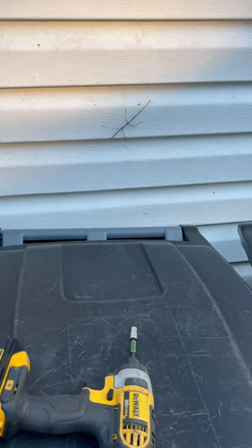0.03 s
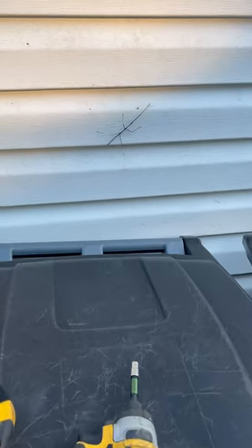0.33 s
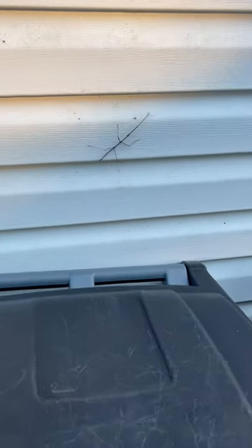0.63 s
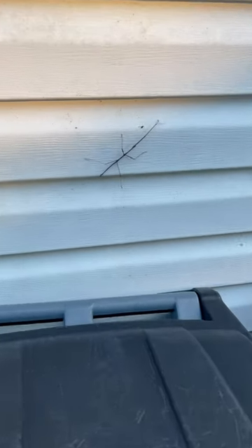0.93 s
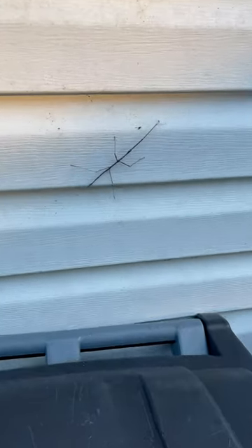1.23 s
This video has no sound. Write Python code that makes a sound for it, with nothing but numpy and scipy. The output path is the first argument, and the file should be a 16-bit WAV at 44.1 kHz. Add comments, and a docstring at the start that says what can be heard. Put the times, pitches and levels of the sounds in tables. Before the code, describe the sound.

An outdoor air conditioner hums throughout, with rushing fan air, a low drone and a faintly rasping buzz. A thin whine swells to its strongest around 1 second, then wavers and eases. At about 2 seconds, a few quick clicks and a faint rustle sound close by, with soft bumps on the handheld microphone. Another dull bump comes near 4 seconds.

```python
"""A humming machine, most likely an air conditioner's outdoor unit, heard from beside a house wall.
It is out of sight. Its fan roars with turbulent air and drones as the blades turn; its compressor's
shaft drives a buzz, a rasp at every turn and a thin whine that swells and fades.
The two-port stereo microphone is handheld and moves in to the wall at the start. Halfway through,
something small clicks and rustles close by, and the hand bumps the microphone softly."""
import sys
import numpy as np
from scipy import signal
from scipy.fft import rfft, irfft
from scipy.io import wavfile

SR = 44100
rng = np.random.default_rng(int(sys.argv[2]) if len(sys.argv) > 2 else 0)


def generate_wav(sig):
    """Save sig (samples, or channels by samples) to the path in sys.argv[1] as 16-bit PCM at SR."""
    pcm = np.round(np.clip(np.atleast_2d(sig).T, -1, 1) * 32767).astype(np.int16)
    wavfile.write(sys.argv[1], SR, pcm)


N = 176400
T = np.arange(N) / SR
HZ = np.fft.rfftfreq(N, 1 / SR)

# the fan's roar, heard at the wall: freq_hz, density_db
ROAR_SPECTRUM = [(15, -106), (25, -108), (33, -83), (42, -81), (75, -77), (150, -77.5), (250, -75),
                 (340, -76.5), (440, -73), (520, -78), (620, -75.5), (800, -81), (1100, -80.5),
                 (1400, -86.5), (2200, -88.5), (2700, -97), (3500, -94.5), (4700, -101.5), (5400, -105),
                 (7500, -105), (10000, -111), (11500, -113), (12500, -108.5), (14000, -109), (15500, -115)]
# its colour before the microphone has moved in: freq_hz, gain_db
ROAR_START_COLOUR = [(60, -6), (170, 0), (230, -1), (400, 2), (650, -3.5), (850, -4), (1050, 5), (1250, 3),
                     (1800, 2.5), (4000, 1), (8000, 5), (15000, 3)]
# three blade tones, then a higher note: pitch_hz, base_db, balance_db (positive is left)
FAN_TONES = [(104.7, -50, 0), (209.3, -61, 1), (314, -67, 4), (392.5, -53, 3)]
# rise of the blade tones: time_s, gain_db
BLADE_GAIN = [(0, -6.5), (.8, -3), (1.3, -0.5), (2, 0.5), (3, 0.5), (4, 2)]
# rise and fall of the higher note: time_s, gain_db
HIGH_NOTE_GAIN = [(0, -2.5), (.5, -.5), (.75, 2), (1.15, .5), (1.45, 2), (1.9, -1), (2.3, -1.5),
                  (2.8, -1.5), (3.2, -4), (4, -2.5)]

# the compressor's shaft, sagging a little: time_s, speed_hz
SHAFT_SPEED = [(0, 58.17), (.8, 58.182), (1.5, 58.155), (4, 58.15)]
# its buzz: order (multiple of the shaft speed), base_db, balance_db
BUZZ_HARMONICS = [(1, -54, 0), (2, -60, 1), (13, -63.5, 13), (16, -68, 9), (19, -69, 9), (23, -70, 8),
                  (25, -72, 6), (31, -64, 6), (32, -63, 10), (33, -62, 5), (36, -72, 7), (38, -73, 4),
                  (39, -70, 2), (40, -66, 3), (41, -71, 3), (42, -69, 3), (48, -68, 0), (72, -78, -9),
                  (73, -79, -11), (74, -80, -1), (76, -76, -4), (81, -76, -3), (85, -82, -10),
                  (87, -83, -9), (103, -79, 0), (121, -82, 0), (122, -85, 0), (134, -86, 0), (135, -85, 0),
                  (143, -86, 0)]
# its deepest hum, order 1: time_s, gain_db
HUM_GAIN = [(0, 4), (.8, -6), (1.3, 4), (1.8, -6), (2.5, 3.5), (3.2, 0.5), (4, 2.5)]
# three buzz harmonics that swell and fade: order
SWELLING_ORDERS = (31, 32, 33)
# their swells: time_s, gain_db of each
SWELL_GAINS = [(0, -8, -9, -7), (.4, -8, -10, -2), (.85, -7, -1, 0), (1.45, -5, 1, -9),
               (1.85, -10, -3, -11), (2.1, -4, -6, -3), (2.9, 0, -8, 1), (3.4, 0, -11, 0), (4, 0, -5, -1)]

# the whine's main tone: time_s, level_db
WHINE_LEVEL = [(0.06, -53), (.15, -55), (0.27, -50.3), (.5, -50), (0.58, -52), (0.87, -43.3), (1.03, -41.7),
               (1.15, -45.5), (1.3, -52), (1.39, -61), (1.45, -52), (1.5, -58), (1.57, -52), (1.83, -56),
               (1.89, -47.5), (1.95, -47.5), (2.04, -61), (2.11, -48), (2.17, -47), (2.29, -56),
               (2.42, -48), (2.52, -47.7), (2.61, -52), (2.73, -47.7), (2.87, -47.2), (3.1, -49.7),
               (3.5, -51.7), (3.85, -53), (4, -56)]
# its balance as the microphone moves: time_s, balance_db
WHINE_BALANCE = [(0, 0), (.7, -.5), (1, 1), (1.3, -1), (1.4, 4), (1.5, -1), (1.78, 0), (1.85, -9),
                 (1.92, -1), (2, 0), (2.5, 1), (2.62, -9), (2.7, -3), (2.8, 0), (4, 0)]
# its phase between the ports: time_s, left_lead_rad
WHINE_LEAD = [(0, 2.7), (.3, 3.1), (.42, 3.65), (.6, 3.65), (.72, 4.1), (.88, 4.2), (1.2, 3.2), (1.3, 3.6),
              (1.55, 2.8), (1.72, 3.4), (1.9, 3), (2, 3.3), (2.3, 3.2), (2.55, 3.45), (2.67, 2.9),
              (2.8, 3.1), (3.3, 3.1), (3.5, 2.83), (4, 2.7)]
# the four side tones around it: order
SIDE_ORDERS = (49, 50, 52, 53)
# their strength: time_s, level_db of each
SIDE_LEVELS = [(0, -65, -58, -65, -74), (.4, -64, -56, -68, -76), (.68, -61, -51.5, -63, -70),
               (.95, -61, -57, -64, -73), (1.2, -70, -58.5, -56.5, -74), (1.3, -69, -62, -63, -73),
               (1.52, -69, -56.5, -75, -74), (1.72, -74, -64, -62, -67), (2.1, -77, -62, -63, -62),
               (2.35, -63, -72, -67, -76), (2.54, -65, -62, -71, -80), (2.7, -66, -72, -61.5, -73),
               (3.3, -67, -72, -60.5, -70), (3.7, -68, -64, -63.5, -70), (4, -66, -62.5, -65, -70)]
# their place as the microphone moves: time_s, balance_db, left_lead_rad
SIDE_PLACE = [(0, 10, 4), (.28, 7, 3.3), (.45, 1, 3.95), (.7, 1.5, 3.95), (.95, 0, 3.5), (1.3, 0, 3.4),
              (1.5, -1, 2.9), (1.65, 3, 3.2), (1.85, 0, 3.6), (2.2, 0, 3.1), (2.5, 0, 3.5), (2.65, 4, 3.5),
              (2.8, 0, 3.15), (4, 0, 3.2)]
# the compressor's very high ring: order, relative_db
RING_HARMONICS = [(213, -5), (215, -2), (216, -1), (217, -5)]
# its rise and fall: time_s, base_db
RING_LEVEL = [(0, -87), (1.4, -83), (1.9, -78), (2.4, -83), (3, -78.5), (4, -78)]

# the compressor's rasp: freq_hz, density_db
RASP_SPECTRUM = [(500, -115), (1500, -98), (2400, -89), (3600, -104), (5200, -103), (6000, -99),
                 (6600, -105), (7600, -102), (9300, -107), (10700, -105), (11400, -117), (12500, -109),
                 (13000, -111), (14200, -105), (15600, -105)]
# its slow fade: time_s, gain_db
RASP_GAIN = [(0, 4.5), (.4, 1), (.9, -1.5), (1.8, -1), (2.6, -4), (4, -3.5)]
# how strongly it pulses: time_s, depth
RASP_DEPTH = [(0, .85), (.5, .62), (1.1, .45), (2, .5), (2.6, .35), (4, .3)]

# clicks close by: start_s, level_db, pitch_hz, width_octaves, decay_s, balance_db
CLICKS = [(2.027, -48, 4200, .45, .004, 0), (2.045, -49, 3900, .3, .002, 0),
          (2.0775, -34.3, 4300, .3, .003, -3.5), (2.0783, -43.5, 7800, .55, .005, -1),
          (2.0922, -29.3, 3900, .22, .0017, -.5), (2.1075, -40, 1500, .25, .005, 4),
          (2.117, -46, 2200, .9, .003, 0), (2.608, -54.5, 14000, .15, .007, 0)]
# the rustle around them: freq_hz, density_db
RUSTLE_SPECTRUM = [(300, -110), (1400, -91), (2800, -97), (4200, -92), (5000, -93), (6200, -101),
                   (8500, -107), (12000, -116), (15500, -118)]
# its brief swell: time_s, gain_db
RUSTLE_GAIN = [(1.98, -11), (2.03, -11), (2.07, 8), (2.11, -2), (2.16, 2.5), (2.23, -1), (2.45, -3),
               (2.6, -22)]
# the hand on the microphone: start_s, level_db, pitch_hz, length_s
BUMPS = [(2.062, -34.5, 83, 0.026), (2.3, -43, 64.6, 0.076), (3.984, -31.5, 141, 0.024)]

# how alike noise is at the microphone's two ports: freq_hz, likeness (0-1)
PORT_LIKENESS = [(60, .995), (130, .98), (300, .93), (600, .72), (1200, .65), (1700, .5), (2700, .8),
                 (3200, .75), (3700, .2), (4700, .25), (5600, .7), (6700, .5), (8000, .65), (8800, .55),
                 (10000, .9), (11400, .6), (12400, .92), (13600, .65), (15000, .92)]
# how much louder it is on the left: freq_hz, balance_db
PORT_BALANCE = [(60, 0), (110, 0), (200, 2), (380, 4), (700, 9), (1290, 8), (2380, 1), (4400, -1.5),
                (8000, 0), (15000, 0)]
# phase between the ports: freq_hz, left_lead_rad
PORT_LEAD = [(0, 0), (700, .3), (1300, .5), (2300, 3), (3200, 3.1), (4200, 1), (5400, 3.1), (6100, 3.5),
             (7000, 5.8), (8000, 6.5), (9500, 9.3), (10500, 9.6), (12000, 12.5), (13000, 12.6),
             (14700, 15.6), (15800, 15.7)]

RASP_TURN, THROB_TURN = .33, .5  # where in each shaft turn the rasp and the whine's throb fall


def fan_roar(settle_s=1.14, flutter_db=.35, swell_db=1.06):
    """Turbulent air from the fan; its colour shifts as the microphone moves in to the wall."""
    at_wall = noise_at_ports(ROAR_SPECTRUM, rng.standard_normal((2, N)))
    at_start = irfft(rfft(at_wall) * amp(at_hz(ROAR_START_COLOUR, HZ)), N)
    settled = np.clip(T / settle_s, 0, 1) ** 2
    roar = at_start + settled * (at_wall - at_start)
    return roar * amp(flutter_db * drift(16) + swell_db * drift(2.18))


def fan_drone(slip_cycles=.033, blade_waver_db=.66, note_waver_db=1.5):
    """Tones of the turning blades, and a less steady note above them."""
    out = np.zeros((2, N))
    for hz, db, balance_db in FAN_TONES[:-1]:
        cycles = hz * T + rng.random() + slip_cycles * drift(16)
        level_db = db + curve(BLADE_GAIN) - blade_waver_db * drift(11)
        out += tone(cycles, balance_db, at_hz(PORT_LEAD, hz)) * amp(level_db)
    hz, db, balance_db = FAN_TONES[-1]
    cycles = hz * T + 2 * slip_cycles * drift(4.3)
    level_db = db + curve(HIGH_NOTE_GAIN) + note_waver_db * drift(7.7)
    return out + tone(cycles, balance_db, at_hz(PORT_LEAD, hz)) * amp(level_db)


def compressor(slip_turns=.002):
    """One shaft drives the buzz, the whine, the ring and the rasp."""
    turns = np.cumsum(curve(SHAFT_SPEED)) / SR + slip_turns * drift(1.627)
    return buzz(turns) + whine(turns) + high_ring(turns) + rasp(turns)


def buzz(turns, low_trim_db=-2, high_trim_db=.63, waver_db=2):
    """The deep hum at shaft speed and its wavering harmonics; three of them swell in turn."""
    out = np.zeros((2, N))
    shaft_hz = curve(SHAFT_SPEED).mean()
    swell_db = dict(zip(SWELLING_ORDERS, curves(SWELL_GAINS)))
    for order, db, balance_db in BUZZ_HARMONICS:
        trim_db = high_trim_db if order > 30 else low_trim_db
        gain_db = curve(HUM_GAIN) if order == 1 else trim_db + waver_db * drift(2)
        harmonic = tone(order * turns + rng.random(), balance_db, at_hz(PORT_LEAD, order * shaft_hz))
        out += harmonic * amp(db + gain_db + swell_db.get(order, 0))
    return out


def whine(turns, main_order=51, flutter_db=.5, side_flutter_db=1.2):
    """A thin motor whine; its side tones beat with it, so it throbs once a turn."""
    turns = turns - THROB_TURN
    out = tone(main_order * turns, curve(WHINE_BALANCE), curve(WHINE_LEAD))
    out *= amp(curve(WHINE_LEVEL) + flutter_db * drift(18))
    for order, db in zip(SIDE_ORDERS, curves(SIDE_LEVELS)):
        out += tone(order * turns, *curves(SIDE_PLACE)) * amp(db + side_flutter_db * drift(16))
    return out


def high_ring(turns):
    """Very high shaft harmonics, dead centre, that beat together in step with the rasp."""
    ring = sum(tone(order * (turns - RASP_TURN), 0, 0) * amp(db) for order, db in RING_HARMONICS)
    return ring * amp(curve(RING_LEVEL))


def rasp(turns, repeat_share=.45):
    """A puff of hiss at every shaft turn: partly the same each time, partly fresh."""
    period = round(SR / curve(SHAFT_SPEED).mean())
    random_phases = np.exp(2j * np.pi * rng.random((2, period // 2 + 1)))
    one_turn = unit_rms(irfft(random_phases, period))
    repeated = one_turn[:, np.arange(N) % period]
    fresh = rng.standard_normal((2, N))
    hiss = np.sqrt(repeat_share) * repeated + np.sqrt(1 - repeat_share) * fresh
    puffs = unit_rms(np.exp(curve(RASP_DEPTH) * np.cos(2 * np.pi * (turns - RASP_TURN))))
    return noise_at_ports(RASP_SPECTRUM, hiss * puffs) * amp(curve(RASP_GAIN))


def clicks(rise_s=.0008, steepness=3.6):
    """Short snaps close to the microphone, each ringing in one broad resonance."""
    out = np.zeros((2, N))
    t = np.arange(4096) / SR
    hz = np.fft.rfftfreq(len(t), 1 / SR)
    for start_s, db, pitch_hz, width_octaves, decay_s, balance_db in CLICKS:
        resonance = 1 / (1 + abs(np.log2((hz + 1) / pitch_hz) / width_octaves) ** steepness)
        ring = irfft(rfft(rng.standard_normal((2, len(t)))) * resonance)
        envelope = np.minimum(t / rise_s, 1) * np.exp(-np.maximum(t - rise_s, 0) / decay_s)
        snap = ring * envelope
        snap *= np.linalg.norm(envelope) / np.linalg.norm(snap, axis=1, keepdims=True)
        add(out, start_s, amp(db) * pan(balance_db) * snap)
    return out


def with_yard_echo(sound, echo_db=-7.5, t60_s=.2):
    """A close sound plus the faint, short tail that the yard sends back."""
    tail = rng.standard_normal((2, SR)) * amp(-60 * T[:SR] / t60_s)
    tail /= np.linalg.norm(tail[0])
    return sound + amp(echo_db) * signal.fftconvolve(sound, tail, axes=1)[:, :N]


def rustle(grains_per_s=450, spread_db=3.8):
    """A faint crackle, loudest around the clicks: hiss broken into tiny, uneven grains."""
    grain_db = spread_db * np.interp(T * grains_per_s, np.arange(4096), rng.standard_normal(4096))
    crackle = rng.standard_normal((2, N)) * unit_rms(amp(grain_db))
    return noise_at_ports(RUSTLE_SPECTRUM, crackle) * amp(curve(RUSTLE_GAIN))


def hand_bumps():
    """Dull pushes of the hand on the microphone, a few cycles each."""
    out = np.zeros((2, N))
    for start_s, db, pitch_hz, length_s in BUMPS:
        t = np.arange(0, length_s, 1 / SR)
        envelope = np.sin(np.pi * t / length_s) ** 2
        add(out, start_s, amp(db) * envelope * np.sin(2 * np.pi * pitch_hz * t))
    return out


def noise_at_ports(spectrum, white):
    """Colours two white noises (dB per Hz) and blends them as the two ports pick them up."""
    left, unrelated = rfft(white) * np.sqrt(SR / 2)
    likeness = at_hz(PORT_LIKENESS, HZ)
    right = likeness * left + np.sqrt(1 - likeness ** 2) * unrelated
    right *= np.exp(-1j * at_hz(PORT_LEAD, HZ))
    return irfft(np.array([left, right]) * pan(at_hz(PORT_BALANCE, HZ)) * amp(at_hz(spectrum, HZ)), N)


def tone(cycles, balance_db, left_lead_rad):
    """One partial with an rms of 1 across the two ports."""
    phase = 2 * np.pi * cycles - np.array([[0], [1]]) * left_lead_rad
    return np.sqrt(2) * pan(balance_db) * np.cos(phase)


def pan(balance_db):
    """Left and right gains that keep the power."""
    gains = amp(np.array([[.5], [-.5]]) * balance_db)
    return gains / np.sqrt(np.mean(gains ** 2, 0))


def drift(rate_hz):
    """Smooth random wander with an rms of about 1."""
    wander = signal.resample(rng.standard_normal(128), 2048)
    return np.interp(T * rate_hz * 32, np.arange(2048), wander)


def amp(db):
    """Decibels to gain."""
    return 10 ** (np.asarray(db) / 20)


def unit_rms(x):
    """Scales to an rms of 1."""
    return x / np.sqrt(np.mean(x ** 2) + 1e-20)


def at_hz(points, hz):
    """Reads a spectrum on a log-frequency axis."""
    freq_hz, value = np.transpose(points)
    return np.interp(np.log(hz + 1), np.log(freq_hz + 1), value)


def curve(points):
    """Reads a time curve at every sample."""
    return np.interp(T, *np.transpose(points))


def curves(rows):
    """Reads each column of a time table at every sample."""
    time_s, *columns = np.transpose(rows)
    return [np.interp(T, time_s, column) for column in columns]


def add(mix, start_s, sound):
    """Mixes a sound in at a time."""
    part = mix[:, round(start_s * SR):][:, :sound.shape[-1]]
    part += sound[..., :part.shape[1]]


def scene():
    """The machine out of sight, with the small noises near the microphone."""
    machine = fan_roar() + fan_drone() + compressor()
    return machine + with_yard_echo(clicks()) + rustle() + hand_bumps()


def record(dry):
    """The recorder opens a moment late and cuts the top treble."""
    start_s, fade_s, cutoff_hz = .0352, .0013, 15750
    opened = np.clip((T - start_s) / fade_s, 0, 1)
    lowpass = signal.firwin(801, cutoff_hz, window=("kaiser", 9), fs=SR)
    return signal.oaconvolve(dry * opened, lowpass[None], "same")


dry = scene()
out = record(dry)
generate_wav(out)
```